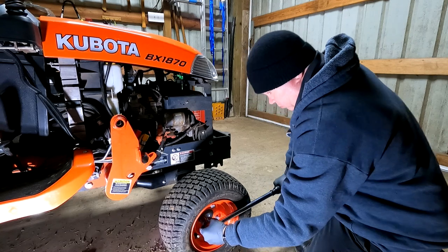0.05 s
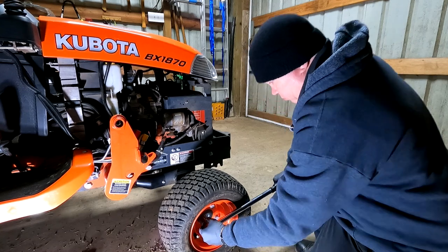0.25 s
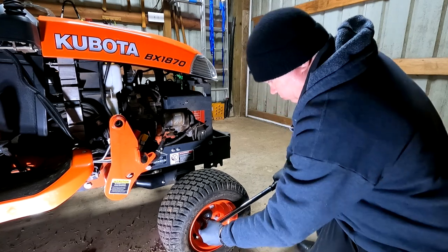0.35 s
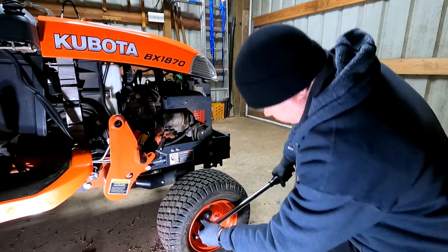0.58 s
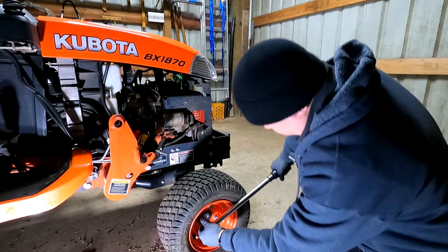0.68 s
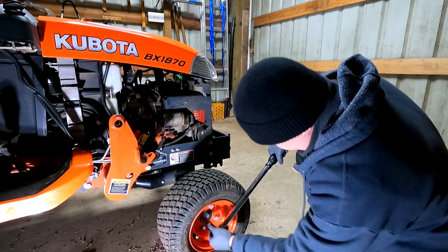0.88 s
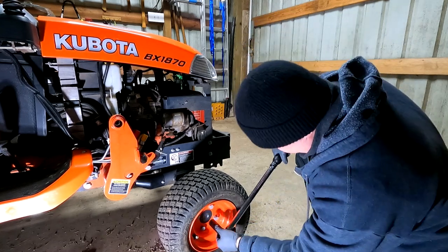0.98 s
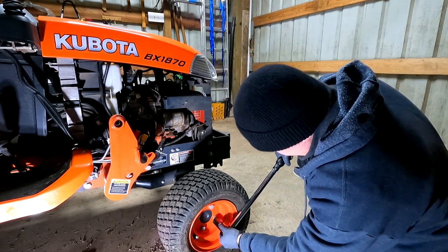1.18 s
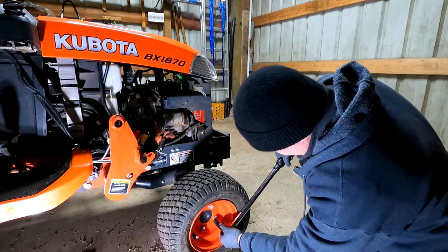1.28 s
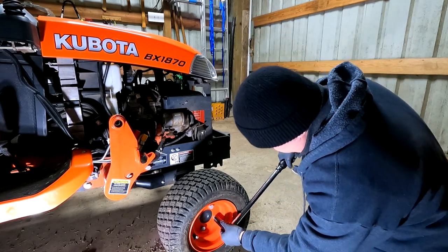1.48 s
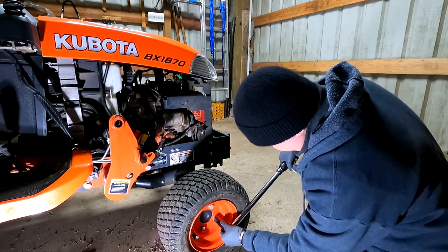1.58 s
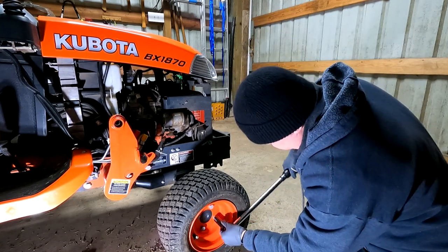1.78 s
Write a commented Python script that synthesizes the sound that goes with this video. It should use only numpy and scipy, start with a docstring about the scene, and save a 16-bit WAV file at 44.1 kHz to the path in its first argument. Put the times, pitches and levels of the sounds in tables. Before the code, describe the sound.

Torque wrench clicks loudly twice on a wheel bolt, then lighter knocks echo in a metal shed

```python
"""Over a soft rustle of clothes, a click-type torque wrench on a wheel bolt snaps over and snaps back;
bar, rim and tyre ring in a sheet-metal shed. Dull and bright knocks, a short socket scrape and a low bump follow.
Uneven bursts and soft pushes excite decaying resonances; shaped noise makes rustle, sleeve and a wavering rumble.
The shed answers with a diffuse tail of noise, and two microphone channels take it all."""
import sys
import numpy as np
from scipy import signal
from scipy.io import wavfile

SR = 44100
rng = np.random.default_rng(int(sys.argv[2]) if len(sys.argv) > 2 else 0)


def rack_gain(trim_db):
    """Turn a fader trim in dB into the linear factor to multiply a signal by."""
    fader = np.asarray(trim_db, float)
    return 10 ** (fader / 20)


def to_wav(sig):
    """Store sig (one row per channel, or 1-D mono) as 16-bit WAV at the path in sys.argv[1].

    Samples outside -1..1 are clipped; the rate is SR.
    """
    pcm = np.clip(np.atleast_2d(sig), -1, 1) * 32767
    pcm = np.round(pcm).astype(np.int16)
    wavfile.write(sys.argv[1], SR, pcm.T)  # frames by channels


N = 81585

# clothes and air: (time [s], level [dB])
RUSTLE_LEVEL = [(0, -66.5), (.2, -62.5), (.7, -76.5), (.84, -63.5), (.95, -64.5), (1.03, -61), (1.2, -64.5),
                (1.3, -66), (1.5, -62.5), (1.62, -69.5), (1.85, -68)]
# their spectrum: (frequency [Hz], relative density [dB per Hz])
RUSTLE_COLOUR_BY_HZ = [(30, 1.5), (60, -3.5), (110, -11.5), (170, 1.5), (300, -1), (500, -4.5), (800, -15),
                       (1000, -6.5), (1500, -9.5), (2200, -8), (3200, -12.5), (5000, -6), (7500, -14.5),
                       (9000, -21), (12500, -21.5), (15000, -41)]
# left-right likeness of the rustle: (frequency [Hz], correlation [-1..1])
RUSTLE_LIKENESS = [(60, 0.19), (240, 0.18), (950, 0.58), (3770, 0.44), (15000, 1)]
# sleeve rubs: (time [s], level [dB])
SLEEVE_LEVEL = [(0, -89), (.55, -67), (.7, -64.5), (.85, -69), (.93, -72.5), (1.03, -67.5), (1.2, -68),
                (1.3, -82), (1.85, -74)]
# low rumble, in lumps: (time [s], level [dB])
RUMBLE_LEVEL = [(0, -57), (.03, -72), (.12, -74), (.15, -61), (.19, -68), (.7, -66), (.8, -62), (.92, -62),
                (.96, -55), (1.0, -58), (1.03, -72), (1.17, -72), (1.2, -64), (1.29, -62), (1.33, -72),
                (1.37, -64), (1.42, -68), (1.6, -62), (1.75, -64), (1.85, -72)]
# balance of the background: (time [s], left minus right [dB])
BACKGROUND_BALANCE = [(0, -4), (.6, 0.5), (.8, -7), (1, -2), (1.25, -2.5), (1.5, -2), (1.85, -3.5)]
# the wrench snaps: (time [s], crack level [dB], rattle length [s], thump level [dB])
WRENCH_SNAPS = [(.2275, -2, 0.00086, -15), (.4205, -3, 0.0035, -16.5)]
# bar and pawl, short rings: (frequency [Hz], T60 [s], first snap [dB re crack], second snap [dB re crack])
BAR_RINGS = [(935, 0.034, -9.5, -6.5), (1827, .02, -5.5, -8), (2349, 0.0061, 5, -5), (3520, 0.005, 4, -2),
             (4927, 0.005, 5, -2.5), (6460, 0.0047, -4, 0.5), (7410, 0.0087, 4.5, -7),
             (8600, 0.0033, 5, -8.5), (10960, 0.01, -5.5, -3), (13100, 0.013, -16, -9.5)]
# rim and tyre: (frequency [Hz], T60 [s], first snap [dB re thump], second snap [dB re thump])
WHEEL_RINGS = [(46, 0.32, -8, -10.5), (68.6, 0.38, -9.5, -9.5), (116, 0.2, -7, -3.5),
               (181.2, 0.097, 5.5, 5), (203, 0.26, -9, -4.5), (250, 0.32, -7, -7), (290.8, 0.31, -9, -10),
               (390, .1, -17, -16), (549.5, 0.2, -18.5, -15), (748, .3, -21, -40), (930, 0.88, -23, -24.5),
               (954, 0.37, -23.5, -23.5), (988, 0.5, -18.5, -25.5), (2178, 0.26, -26, -19),
               (2258, 0.32, -25.5, -20.5)]
# decay of the shed, before each echo's tail share: (frequency [Hz], T60 [s])
SHED_DECAY = [(40, 0.75), (160, 0.27), (420, 0.69), (1100, 0.47), (2900, 0.7), (4700, 0.64), (7500, 0.47),
              (9000, 0.36), (14000, 0.77)]
# spectrum of the shed's tail at its start: (frequency [Hz], relative density [dB per Hz])
SHED_COLOUR_BY_HZ = [(40, -5), (200, 4.5), (700, -0.5), (950, 0), (1300, -6), (2200, -2), (3000, -11.5),
                     (4600, -1), (5700, 0.5), (7400, -2), (9000, -13), (10800, -6.5), (14000, -8)]
# left-right likeness of the tail: (frequency [Hz], correlation [-1..1])
SHED_LIKENESS = [(40, 1), (500, 0.94), (2000, 0.27), (5000, 0.62), (9000, 1), (14000, 0.2)]
# knocks of socket and handle:
# (time [s], relative level [dB], length [s], dull above [Hz], treble re blow [dB])
KNOCK_BLOWS = [(0.634, -30, 0.0048, 313, -33), (0.977, -59, 0.0014, 8900, -2),
               (1.416, -17, 0.0026, 1944, -23.5), (1.603, -35.5, 0.012, 700, -30),
               (1.643, -30, 0.0087, 1310, -39), (1.6492, -16, 0.0035, 2700, -3),
               (1.772, -52, 0.0017, 9000, 9)]
# socket slides on the bolt: (time [s], level before the bass cut [dB])
SCRAPE_LEVEL = [(.984, -61), (.989, -47), (.995, -59), (.999, -35.5), (1.003, -68), (1.011, -60),
                (1.016, -55)]
# resonances of the sliding socket: (frequency [Hz], width [Hz], relative level [dB])
SOCKET_RESONANCES = [(1000, 110, -6), (1830, 900, 6), (2300, 400, -5), (3560, 500, -4), (5460, 500, -14)]
# tick of the seating socket: (frequency [Hz], T60 [s], relative level [dB])
SEAT_TICK_RINGS = [(3450, 0.0095, -32), (5150, 0.0052, -45), (7130, 0.014, -41)]
# one soft tyre bump: (time [s], relative level [dB], frequency [Hz], T60 [s])
TYRE_BUMP = (1.428, -46, 50, .08)

SLEEVE_LOW_HZ, SLEEVE_HIGH_HZ = 1080, 2000
RUMBLE_HZ, RUMBLE_WIDTH_HZ = 168, 40
AHEAD_STEP_S, AHEAD_DULL_HZ = .0103, 5100
AHEAD_OF_SNAPS_DB, AHEAD_OF_KNOCKS_DB = -16, -24  # loss per step
THUMP_LATE_S, THUMP_SOFT_S, TYRE_SOFT_S = .002, 0.00053, 0.0024
WAVER_DB, WAVER_CORNER_HZ = 2.2, 18
GRIT_DB = 8  # unringing part of the snap, re crack level
CLICK_TO_SHED_DB, CRACK_TO_SHED_DB, THUMP_TO_SHED_DB = 10.5, -21, -10.5
SHED_RISE_S, KNOCKS_TO_SHED_DB = .002, -8.5
# the denser start of each echo, its extra decay on top of the tail's, and the share of the shed's T60
SNAP_EARLY_DB, SNAP_EARLY_T60_S, SNAP_TAIL_SHARE = -4.5, 0.027, 0.98
KNOCK_EARLY_DB, KNOCK_EARLY_T60_S, KNOCK_TAIL_SHARE = 2.5, 0.04, 0.68  # nearer surfaces, shorter tail
KNOCK_LOW_HZ, KNOCK_TOP_HZ = 174, 7800
SLIPS_PER_S, SEAT_S = 3000, 1
SNAP_BALANCE_DB, KNOCK_BALANCE_DB = 0.86, 0.5  # left minus right
MIC_LOW_HZ, MIC_HIGH_HZ = 22.3, 13400
OVERLOAD, LEFT_LAG_S = 1.0, .00001


def at_hz(points, hz):
    """Read a spectrum on a log-frequency axis."""
    points = np.array(points)
    return np.interp(np.log(hz), np.log(points[:, 0]), points[:, 1])


def curve(rows):
    """Gain in time, straight in dB between (time [s], level [dB]) rows."""
    s, db = np.transpose(rows)
    return rack_gain(np.interp(np.arange(N) / SR, s, db))


def balance(left_minus_right_db):
    """Gains of the left and right channels that split a level difference evenly."""
    return rack_gain(left_minus_right_db * np.array([[.5], [-.5]]))


def rms_one(x):
    """Scale to rms 1."""
    return x / np.sqrt(np.mean(x ** 2) + 1e-20)


def cut(x, hz, kind, order=2):
    """Butterworth filter."""
    return signal.sosfilt(signal.butter(order, hz, kind, fs=SR, output="sos"), x)


def ring(x, hz, t60):
    """Two-pole resonance: a unit click sets a decaying sine of height 1 ringing."""
    r = rack_gain(-60 / (t60 * SR))
    w = 2 * np.pi * hz / SR
    return signal.lfilter([0, np.sin(w)], [1, -2 * r * np.cos(w), r * r], x + 1e-18)


def drift(rate):
    """Slow chance, rms 1: noise smoothed twice above a corner of rate Hz."""
    r = np.exp(-2 * np.pi * rate / SR)
    walk = signal.lfilter([1], [1, -2 * r, r * r], rng.standard_normal(N + SR))
    return rms_one(walk[SR:])  # the first second lets the filter settle


def bands(colour, alike, shape):
    """Third-octave bands of stereo noise, each with its level, likeness and shape in time."""
    out = 0
    edges = 32 * 2 ** np.arange(0, 9.1, 1 / 3)
    white = rng.standard_normal((2, 2, N))  # neighbouring bands take turns with two noises
    for k, (low, high) in enumerate(zip(edges, edges[1:])):
        mid, side = cut(white[k % 2], [low, high], "band")
        hz = np.sqrt(low * high)
        c = np.clip(at_hz(alike, hz), -1, 1)
        stereo = np.sqrt(1 + c) * mid + np.sqrt(1 - c) * side * [[1], [-1]]
        out = out + rack_gain(at_hz(colour, hz)) * shape(hz) * stereo
    return out


def burst(start, length):
    """A short run of uneven contacts, dying away as a Gaussian; energy 1."""
    t = np.arange(N) / SR - start
    i = int(start * SR)
    contacts = rng.standard_normal(900) * np.clip(rng.standard_normal(900), -2, 2)
    grit = np.zeros(N)
    grit[i:i + 900] = contacts[:N - i]
    x = grit * np.exp(-(np.maximum(t, 0) / length) ** 2)
    return x / np.sqrt(np.sum(x ** 2))


def unit_click(start):
    """A single sample of height 1."""
    return 1. * (np.arange(N) == int(start * SR))


def soft_push(start, soft):
    """A rounded push of area 1, strongest soft seconds after its start."""
    t = np.maximum(np.arange(N) / SR - start, 0) / soft
    return t * np.exp(-t) / (soft * SR)


def background():
    """Soft rustle and a rubbing sleeve from shaped noise, and a rumble from noise through a low resonance."""
    gust = drift(2)
    rustle = rms_one(bands(RUSTLE_COLOUR_BY_HZ, RUSTLE_LIKENESS, lambda hz: rack_gain(1.2 * gust)))
    noise = rng.standard_normal((2, N)) + 0.5 * rng.standard_normal(N)  # partly shared by both channels
    sleeve = rms_one(cut(noise, [SLEEVE_LOW_HZ, SLEEVE_HIGH_HZ], "band", order=3))
    low = ring(rng.standard_normal(N), RUMBLE_HZ, 2.2 / RUMBLE_WIDTH_HZ)  # T60 from bandwidth
    rumble = rms_one(cut(low, [.75 * RUMBLE_HZ, 1.5 * RUMBLE_HZ], "band", order=3))
    rubbing = curve(SLEEVE_LEVEL) * rack_gain(2.5 * drift(29)) * sleeve
    pan = curve(BACKGROUND_BALANCE) ** np.array([[.5], [-.5]])
    return pan * (curve(RUSTLE_LEVEL) * rustle + rubbing + curve(RUMBLE_LEVEL) * rumble)


def ahead(x, loss_db):
    """Three faint dull copies come ahead of a blow, each one step earlier and weaker."""
    dull = cut(x, AHEAD_DULL_HZ, "low", order=4)
    return sum(rack_gain(loss_db * k) * np.roll(dull, -int(k * AHEAD_STEP_S * SR)) for k in range(1, 4))


def wrench():
    """Each snap rattles the bar's short modes and thumps the wavering wheel; also what reaches the walls."""
    snaps, to_walls = [], np.zeros(N)
    wavers = [rack_gain(WAVER_DB * drift(WAVER_CORNER_HZ)) for j in range(5)]
    for k, (s, crack_db, length, thump_db) in enumerate(WRENCH_SNAPS):
        grit, click = burst(s, length), unit_click(s)
        push = soft_push(s + THUMP_LATE_S, THUMP_SOFT_S)
        sway = soft_push(s + THUMP_LATE_S, TYRE_SOFT_S)
        crack, thump = 0, 0
        for j, (hz, t60, *snap_db) in enumerate(BAR_RINGS):
            crack = crack + (-1) ** j * rack_gain(crack_db + snap_db[k]) * ring(grit, hz, t60)
        for j, (hz, t60, *snap_db) in enumerate(WHEEL_RINGS):
            # the deeper the mode, the softer the blow that drives it
            drive = sway if hz < 90 else push if hz < 450 else click
            thump = thump + (-1) ** j * rack_gain(thump_db + snap_db[k]) * wavers[j % 5] * ring(drive, hz, t60)
        snaps.append(crack + thump + rack_gain(crack_db + GRIT_DB) * grit)
        to_walls += rack_gain(crack_db + CLICK_TO_SHED_DB) * click
        to_walls += rack_gain(CRACK_TO_SHED_DB) * crack + rack_gain(THUMP_TO_SHED_DB) * thump
    return snaps[0], snaps[1], to_walls


def shed(x, early_db, early_t60, share):
    """Diffuse stereo tail of noise, denser at first, dying band by band."""
    t = np.arange(N) / SR
    rise = 1 - np.exp(-(t / SHED_RISE_S) ** 2)
    start = rise * (1 + rack_gain(early_db - 60 * t / early_t60))
    decay = lambda hz: rack_gain(-60 * t / (share * at_hz(SHED_DECAY, hz)))
    tail = bands(SHED_COLOUR_BY_HZ, SHED_LIKENESS, decay) * start
    tail = tail / np.sqrt(np.sum(tail ** 2) / 2)  # mean channel energy 1
    return signal.fftconvolve(x[None], tail, axes=1)[:, :N]


def knocks():
    """Bursts of contact dulled by a low-pass, some treble on top; also the same from bare clicks, for the echo."""
    out = 0
    for s, db, length, dull_hz, treble_db in KNOCK_BLOWS:
        blow = np.stack([burst(s, length), unit_click(s)])
        body = cut(blow, dull_hz, "low", order=6) * np.sqrt(SR / 2 / dull_hz)  # keeps white energy
        treble = rack_gain(treble_db) * cut(blow, KNOCK_TOP_HZ, "low", order=3)
        out = out + rack_gain(db) * np.sqrt(length * SR) * (body + treble) / 2
    return cut(out, KNOCK_LOW_HZ, "high", order=4)


def scrape():
    """Dense random slips drive the socket's resonances, and a burst rings the tick as it seats."""
    slips = (rng.random(N) < SLIPS_PER_S / SR) * rng.standard_normal(N)
    tone = sum(rack_gain(db) * rms_one(ring(slips, hz, 2.2 / width)) for hz, width, db in SOCKET_RESONANCES)
    grit = burst(SEAT_S, 0.00074)
    tick = sum(rack_gain(db) * ring(grit, hz, t60) for hz, t60, db in SEAT_TICK_RINGS)
    fade_in, fade_out = (SCRAPE_LEVEL[0][0] - .01, -90), (SCRAPE_LEVEL[-1][0] + .02, -90)
    return curve([fade_in] + list(SCRAPE_LEVEL) + [fade_out]) * rms_one(tone) + tick


def thud():
    """One soft low bump: a rounded push rings a single damped mode."""
    s, db, hz, t60 = TYRE_BUMP
    return rack_gain(db) * ring(soft_push(s, TYRE_SOFT_S), hz, t60)


def scene():
    """Direct blows, their echo in the shed and the background."""
    over, back, bare_snaps = wrench()
    taps, bare_taps = knocks()
    slide = cut(scrape(), 900, "high", order=4)
    snaps = over + back + ahead(over, AHEAD_OF_SNAPS_DB)
    contacts = taps + slide + ahead(taps, AHEAD_OF_KNOCKS_DB)
    direct = snaps * balance(SNAP_BALANCE_DB) + contacts * balance(KNOCK_BALANCE_DB)
    snap_echo = shed(bare_snaps, SNAP_EARLY_DB, SNAP_EARLY_T60_S, SNAP_TAIL_SHARE)
    knock_echo = shed(rack_gain(KNOCKS_TO_SHED_DB) * (bare_taps + slide),
                      KNOCK_EARLY_DB, KNOCK_EARLY_T60_S, KNOCK_TAIL_SHARE)
    return direct + snap_echo + knock_echo + thud() + background()


def roll_off(x):
    """The treble ends steeply here."""
    return signal.sosfilt(signal.butter(12, 21850, fs=SR, output="sos"), x)


def record(dry):
    """At the microphones left lags a little, the top is cut, peaks overload and the deepest bass is cut."""
    share = np.clip(LEFT_LAG_S * SR, 0, 1)  # the lag as a fraction of one sample
    left = (1 - share) * dry[0] + share * np.roll(dry[0], 1)
    x = cut(np.stack([left, dry[1]]), MIC_HIGH_HZ, "low", order=10)
    mix = cut(np.clip(x, -OVERLOAD, OVERLOAD), MIC_LOW_HZ, "high")
    return roll_off(mix)


dry = scene()
out = record(dry)
to_wav(out)
```